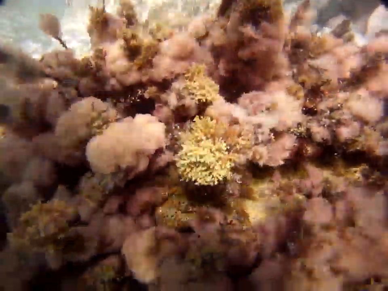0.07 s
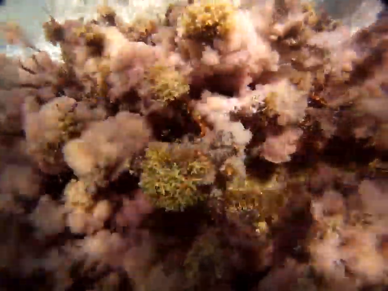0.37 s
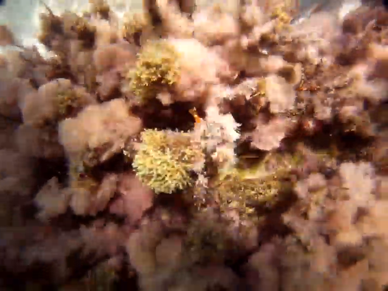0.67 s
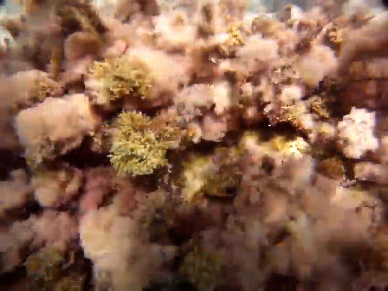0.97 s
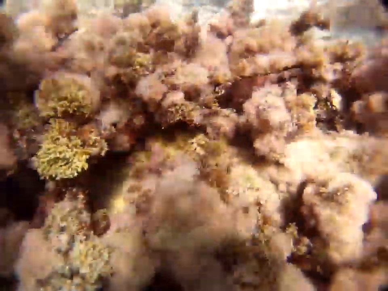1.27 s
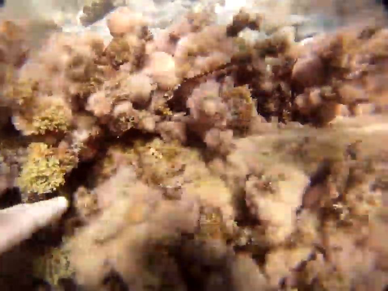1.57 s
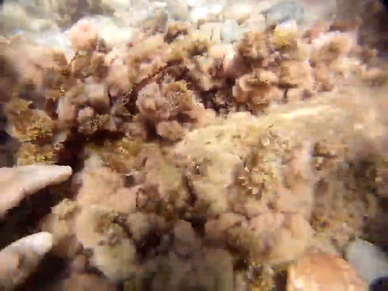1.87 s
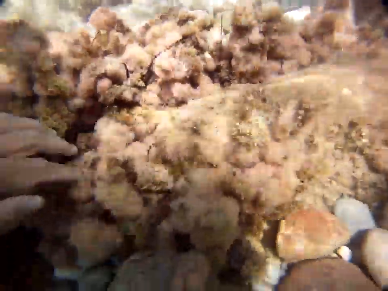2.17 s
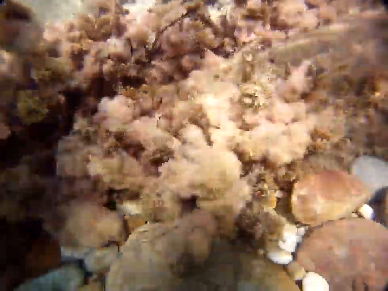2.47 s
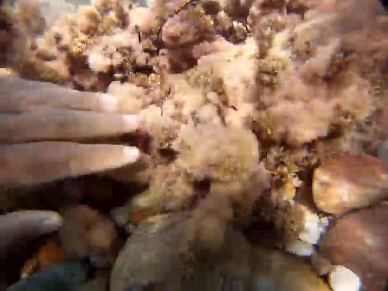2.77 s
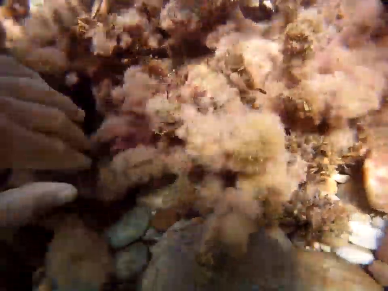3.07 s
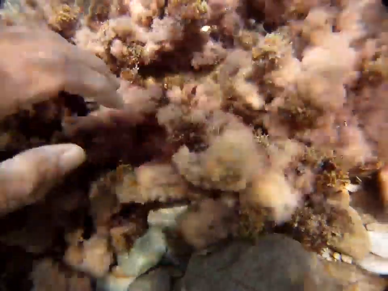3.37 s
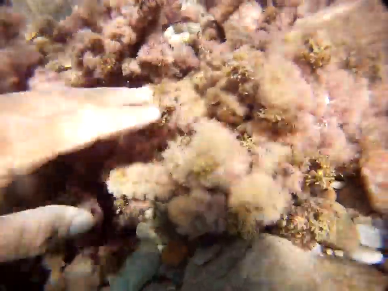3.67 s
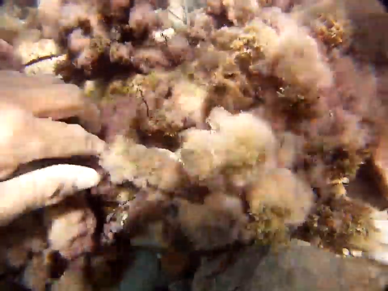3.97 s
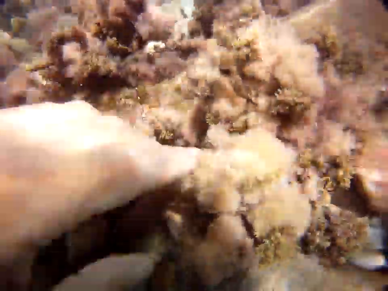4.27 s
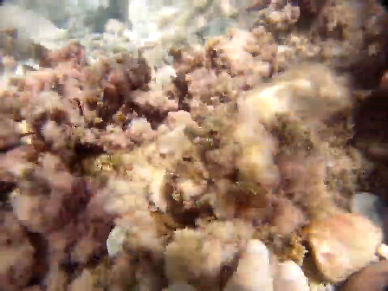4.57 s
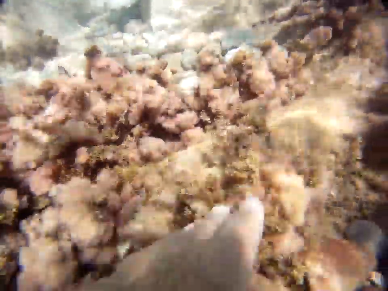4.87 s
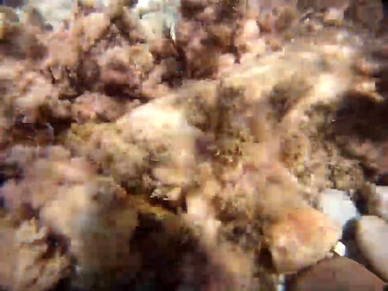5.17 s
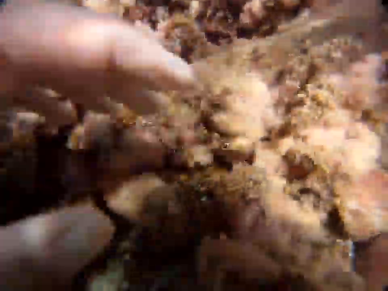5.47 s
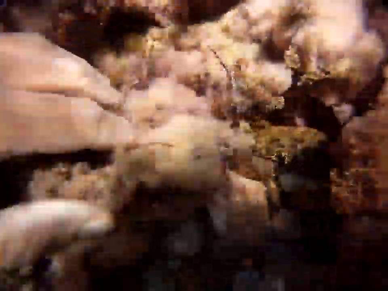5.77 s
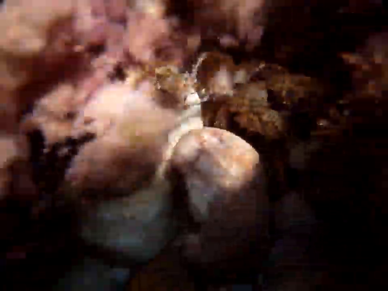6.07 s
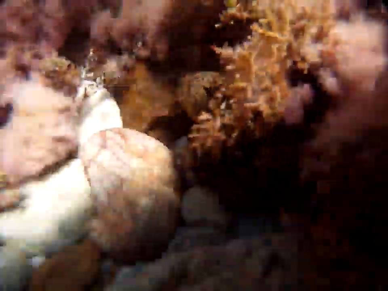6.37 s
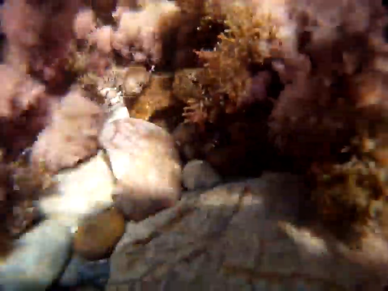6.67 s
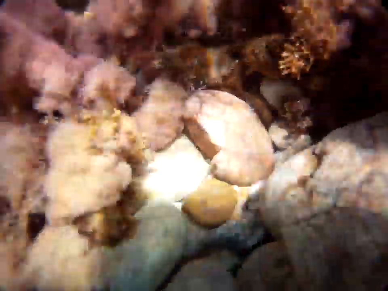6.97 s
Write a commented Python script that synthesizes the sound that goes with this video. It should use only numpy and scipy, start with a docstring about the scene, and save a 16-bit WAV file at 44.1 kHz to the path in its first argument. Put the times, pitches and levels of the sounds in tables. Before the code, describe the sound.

Heard underwater through a camera housing, air gulps and gurgles away while water sloshes, stones click and the housing takes hollow bumps.

```python
"""Under shallow surf, among weedy rocks, heard from inside a sealed camera housing.
Three times a pocket of air tears loose with a throbbing gulp and gurgles away as a cloud of bubbles.
Between them the water sloshes, rumbles and fizzes, single bubbles ping and pebbles click together.
Dull knocks ring the housing; near the end a surge drags gravel past and something scrapes by."""
import sys
import numpy as np
from scipy import signal
from scipy.fft import rfft, irfft
from scipy.io import wavfile
from scipy.ndimage import uniform_filter1d

SR = 44100
rng = np.random.default_rng(int(sys.argv[2]) if len(sys.argv) > 2 else 0)


def materialize(psi):
    """Save the field psi as 16-bit PCM at rate SR to the path in sys.argv[1].

    A 1-D psi becomes a single channel; in a 2-D psi each row is a channel.
    """
    bounded = np.clip(np.atleast_2d(psi).T, -1, 1)
    quanta = np.round(bounded * 32767).astype(np.int16)
    wavfile.write(sys.argv[1], SR, quanta)


N = 310023
TIME = np.arange(N) / SR

# Air pockets tearing loose. Each row: centre in seconds, level in dB, pocket pitch in Hz,
# length in seconds, housing ring in dB relative to the pocket.
AIR_POCKETS = [(0.373, -14, 191, 0.02, 2), (0.516, -28, 163, 0.01, -8), (0.546, -26, 160, 0.014, 4),
               (3.253, -22.5, 230, 0.012, 0.5), (3.283, -16.5, 280, 0.05, -5),
               (3.628, -20.5, 286, 0.0089, -15), (5.653, -12.5, 188, 0.0096, -9),
               (5.666, -10.5, 245, 0.019, 3), (5.975, -33.5, 235, 0.02, -10),
               (6.214, -31.5, 175, 0.013, -15)]
# Clouds of freed air. Each row: start in seconds, big-bubble level in dB, small-bubble level in dB,
# seconds before the cloud thins out.
AIR_CLOUDS = [(0.356, -28.5, -28, 0.21), (3.254, -32.5, -30, 0.23), (5.652, -34, -30, 0.25)]
# Knocks that ring the housing; those during the gurgles are part of their throbbing. Each row: start in
# seconds, peak in dB.
HOUSING_KNOCKS = [(0.46, -20.5), (0.536, -14.5), (4.482, -17), (4.558, -15), (4.607, -11), (4.71, -25.5),
                  (4.73, -12.5), (4.785, -18), (4.848, -18), (4.898, -19.5), (5.71, -17), (5.774, -22),
                  (5.825, -20), (5.891, -27), (6.21, -32)]
# Foreground bubbles. Each row: start in seconds, level in dB, pitch in Hz, seconds to fall 60 dB.
BUBBLE_PINGS = [(0.193, -38, 2080, 0.024), (0.239, -39.5, 3840, 0.05), (0.547, -24.5, 2066, .03),
                (0.6378, -31.5, 1380, 0.026), (0.816, -32, 2010, 0.006), (0.888, -33, 1333, 0.023),
                (0.97, -31.5, 686, 0.02), (1.097, -34, 495, 0.042), (1.372, -37.5, 643, 0.16),
                (2.201, -36, 1806, 0.045), (2.207, -31, 1290, 0.049), (2.409, -42, 1894, 0.093),
                (2.445, -32.5, 1800, 0.029), (2.45, -37.5, 2410, 0.063), (2.485, -29.5, 463, 0.16),
                (3.594, -38, 1570, 0.025), (3.897, -32, 498, 0.26), (3.99, -27, 511, 0.061),
                (4.044, -41, 1310, 0.044), (4.072, -34, 1240, .015), (4.171, -26.5, 450, 0.061),
                (5.021, -40, 1370, 0.049)]
# Foreground pebbles. Each row: start in seconds, peak in dB, treble boost or cut in dB.
PEBBLE_CLICKS = [(0.6368, -33.5, 14), (0.8355, -32.5, 9), (0.944, -32.5, -28), (1.159, -31, -22),
                 (1.3222, -33, -1), (1.6497, -34, 3), (1.6764, -14.5, 16.5), (1.88, -34, 3),
                 (2.2999, -35.5, -15), (2.4507, -33.5, 7), (2.665, -39, 16), (2.919, -40.5, -1),
                 (3.769, -47, 11), (3.9683, -39, 6), (4.2223, -33.5, 18), (6.1779, -28, -26),
                 (6.2982, -24.5, -9), (6.3272, -35, 23), (6.4045, -26.5, -19), (6.4823, -26.5, 21),
                 (6.4983, -24.5, 6), (6.538, -28.5, 1), (6.564, -26.5, 5), (6.9736, -31.5, -22)]
# Passing eddies. Each row: crest in seconds, slosh level in dB, bubble-shower level in dB.
WATER_EDDIES = [(0.07, -50.5, -58), (0.86, -50, -57.5), (1.598, -46.5, -57), (2.471, -38, -47.5),
                (4.0, -44, -55), (4.22, -38.5, -55), (4.52, -38, -66), (4.72, -40, -55.5)]
# Water shoving the housing. Each row: crest in seconds, rumble level in dB.
WATER_SHOVES = [(2.13, -56), (4.75, -40), (4.92, -47), (5.27, -49.5), (6.98, -41.5)]

# EQ curves that give each source its body. Each row: frequency in Hz, gain in dB.
BIG_AIR_EQ = [(20, -20.5), (45, -1.5), (75, -3.5), (110, 0), (135, -7), (175, -7), (250, 2), (310, 0),
              (380, -5), (700, -50.5)]  # deep burble of big bubbles
GURGLE_EQ = [(200, -39), (400, -11), (500, -3), (610, 3), (700, -10), (830, -16.5), (930, -28.5),
             (1130, -24.5), (1390, -24.5), (1850, -30), (2220, -24), (3300, -44.5), (5500, -85)]  # housing rattled by small bubbles
KNOCK_EQ = [(40, -28), (108, -14), (170, -15), (210, -26), (290, -3.5), (360, -21), (465, -3.5), (620, 7),
            (720, 1.5), (900, -32.5), (1060, -14), (1600, -32.5), (2250, -4), (3500, -34)]  # boxy ring of the bumped housing
CLICK_EQ = [(300, -34), (800, -6.5), (1400, 0), (1700, -5), (2100, 5), (2700, -11.5), (3700, -5.5),
            (4400, -15.5), (5500, -20)]  # hard tick of stone
GRAVEL_EQ = [(120, 2), (330, -5), (700, 4.5), (1200, -10), (1600, -8.5), (2050, -5.5), (2600, -10.5),
             (3600, -7.5), (4200, -21), (5000, -26), (5600, -14.5)]  # full-bodied tumble of stones
SCRAPE_EQ = [(500, -16), (1050, 4), (1400, -8), (1850, 3.5), (2400, -4), (2700, -10), (3200, -9), (3600, 3),
             (4100, -19), (4550, -19), (5000, -5), (5500, -13)]  # thin rasp on the housing
SLOSH_EQ = [(150, -23.5), (260, -19), (360, -17.5), (500, -4.5), (630, 1), (720, -5.5), (850, -17.5),
            (1100, -28.5), (2000, -32.5), (5000, -63)]  # hollow midrange of the water
CRACKLE_EQ = [(600, -9.5), (1000, -12), (1400, 5), (1700, -3.5), (2200, 5.5), (2900, -5), (3750, -7),
              (4400, -10), (5500, -9.5)]  # bright fizz of tiny bubbles and grit
RUMBLE_EQ = [(15, -16.5), (35, 3), (55, -6.5), (100, -5), (170, -13), (280, -13.5), (450, -21),
             (1000, -79.5)]  # low end of the moving water

LULL_S, LULL_WIDTH_S = 2.92, 0.35  # the water goes slack between two waves
SURGE_S, SURGE_RISE_S, SURGE_FALL_S = 6.45, 0.17, 0.097  # the surge builds, crests and lets go


def gulps(heave=0.3, churn_db=-10, housing_hz=612):
    """A pocket of air throbs for a few cycles as it tears off, and shakes the housing with it."""
    out = np.zeros(N)
    churn = coloured(rng.standard_normal(N), GURGLE_EQ)
    burble = coloured(rng.standard_normal(N), BIG_AIR_EQ)
    for s, db, pocket_hz, length, ring_db in AIR_POCKETS:
        t = np.arange(-length, length, 1 / SR)
        envelope = np.exp(-np.pi * (2 * t / length) ** 2)
        pocket = np.cos(2 * np.pi * pocket_hz * t) + heave * np.interp(s + t, TIME, burble)
        housing = np.cos(2 * np.pi * housing_hz * t) + from_db(churn_db) * np.interp(s + t, TIME, churn)
        add(out, s - length, from_db(db) * envelope * (pocket + from_db(ring_db) * housing))
    return out


def gurgles(attack_s=0.0097, rush_db=10, rush_s=0.049, sag_db_per_s=20,
            big_fade_db_per_s=107, small_fade_db_per_s=114):
    """Freed air breaks up: big bubbles burble, small ones rattle the housing; both thin as they rise."""
    big, small = 0, 0
    for s, big_db, small_db, hold_s in AIR_CLOUDS:
        age = np.maximum(TIME - s, 0)
        thinning_s = np.maximum(age - hold_s, 0)
        flow = np.minimum(age / attack_s, 1) * from_db(-sag_db_per_s * age)
        accent_db = rush_db * np.exp(-age / rush_s)
        big += flow * from_db(big_db + accent_db - big_fade_db_per_s * thinning_s)
        small += flow * from_db(small_db - small_fade_db_per_s * thinning_s)
    throb = from_db(1.9 * drift(rate=11.5))
    return throb * (big * cloud(BIG_AIR_EQ, per_s=1200) + small * cloud(GURGLE_EQ, per_s=2500))


def cloud(eq, per_s):
    """Bubbles so many that their sum stays fairly even from moment to moment."""
    sound = coloured(grains(per_s, spread_db=3.5), eq)
    local_power = uniform_filter1d(sound ** 2, size=1300)
    return sound / np.sqrt(local_power + 1e-6)


def knocks(contact_s=0.0013, judder=0.038, judder_s=0.0097):
    """Soft bumps ring the housing for a few cycles; each ends in a short judder of its own."""
    out, t = np.zeros(N), TIME[:SR // 30]
    housing = impulse_response(KNOCK_EQ)
    push = t * np.exp(-2 * t / contact_s)
    for s, db in HOUSING_KNOCKS:
        bump = (t == 0) + judder * rng.standard_normal(len(t)) * np.exp(-t / judder_s)
        force = signal.fftconvolve(bump, push)
        thud = signal.fftconvolve(force, housing)
        add(out, s, from_db(db) * thud / np.abs(thud).max())
    return out


def bubbles(onset_cycles=0.75, partner_db=-11, partner_ratio=1.12):
    """Each bubble pings as a dying sine, beating against a smaller one that splits off with it."""
    out, t = np.zeros(N), TIME[:SR // 8]
    wobble = from_db(2 * drift(rate=150))  # the level wavers with the bubble's shape
    for s, db, hz, t60 in BUBBLE_PINGS:
        envelope = from_db(-60 * t / t60) * (1 - np.exp(-t * hz / onset_cycles))
        partner = np.sin(2 * np.pi * (partner_ratio * hz * t + rng.random()))
        pair = np.sin(2 * np.pi * hz * t) + from_db(partner_db) * partner
        ping = envelope / envelope.max() * pair
        add(out, s, from_db(db) * ping * np.interp(s + t, TIME, wobble))
    return out


def pebbles(scatter_s=0.0033, treble_hz=2800):
    """Stone meets stone: a sharp tick and a few milliseconds of scatter from the rocks around."""
    out, t = np.zeros(N), TIME[:SR // 30]
    stone = impulse_response(CLICK_EQ)
    lowpass = signal.butter(3, treble_hz, "low", fs=SR, output="sos")
    highpass = signal.butter(3, treble_hz, "high", fs=SR, output="sos")
    for s, db, treble_db in PEBBLE_CLICKS:
        contact = (t == 0) + rng.standard_normal(len(t)) * np.exp(-t / scatter_s)
        tick = signal.fftconvolve(contact, stone)
        click = signal.sosfilt(lowpass, tick) + from_db(treble_db) * signal.sosfilt(highpass, tick)
        add(out, s, from_db(db) * click / np.abs(click).max())
    return out


def gravel(level_db=-37):
    """Small stones tumble and clack as the surge pulls at them."""
    clacks = pips(per_s=400, spread_db=3, cycles=43, low_hz=1080, high_hz=5200)
    contacts = grains(per_s=650, spread_db=3.6) + 0.5 * clacks + 0.2 * rng.standard_normal(N)
    surge = swell(SURGE_S, SURGE_RISE_S, SURGE_FALL_S)
    return from_db(level_db) * surge * coloured(contacts, GRAVEL_EQ)


def scrape(level_db=-40.5):
    """Something rubs briefly along the housing in a dense rasp of tiny contacts."""
    rasp = coloured(grains(per_s=6000, spread_db=3.5), SCRAPE_EQ)
    return from_db(level_db) * hump(crest_s=6.872, width_s=0.018) * rasp


def sloshing(bed_db=-49.5, lull_db=-6, plop_db=-9):
    """Water sloshes and plops round the housing, louder in each eddy."""
    splashes = grains(per_s=900, spread_db=2) * from_db(2.67 * drift(rate=29))
    slosh = coloured(splashes, SLOSH_EQ)
    plops = pips(per_s=45, spread_db=2.5, cycles=87, low_hz=450, high_hz=704, count=8)
    eddies = [from_db(db) * swell(s, rise_s=0.031, fall_s=0.18) for s, db, _ in WATER_EDDIES]
    return (slosh + from_db(plop_db) * plops) * together(bed_gain(bed_db, lull_db), *eddies)


def showers():
    """Each eddy tears off a quick run of tiny bubbles that pip at pitches of their own."""
    tiny_bubbles = pips(per_s=450, spread_db=4, cycles=40, low_hz=802, high_hz=4100)
    eddies = [from_db(db) * swell(s, rise_s=0.083, fall_s=0.07) for s, _, db in WATER_EDDIES]
    return coloured(tiny_bubbles, CRACKLE_EQ) * together(*eddies)


def rumbling(bed_db=-54, lull_db=-2.5, surge_db=-43):
    """The moving water rumbles, more so when it shoves the housing and during the surge."""
    churn = rng.standard_normal(N) * from_db(1.8 * drift(rate=28))
    shoves = [from_db(db) * hump(s, width_s=0.1) for s, db in WATER_SHOVES]
    surge = from_db(surge_db) * hump(SURGE_S, width_s=0.36)
    return coloured(churn, RUMBLE_EQ) * together(bed_gain(bed_db, lull_db), surge, *shoves)


def crackling(bed_db=-57.5, lull_db=-3.5, surge_db=-49, grit_db=-9, pip_db=-6):
    """Tiny bubbles pip and grit ticks in the fizz of far surf, in flurries as the bed is stirred."""
    flurry = from_db(3.1 * drift(rate=7))
    tiny_bubbles = pips(per_s=150 * flurry, spread_db=4, cycles=65, low_hz=973, high_hz=4860)
    grit = grains(per_s=80 * flurry, spread_db=8.5)
    fizz = rng.standard_normal(N) + from_db(grit_db) * grit + from_db(pip_db) * tiny_bubbles
    surge = from_db(surge_db) * swell(SURGE_S, SURGE_RISE_S, SURGE_FALL_S)
    return coloured(fizz, CRACKLE_EQ) * together(bed_gain(bed_db, lull_db), surge)


def bed_gain(bed_db, lull_db):
    """A background layer's steady gain, dipping once as the water goes slack."""
    return from_db(bed_db + lull_db * hump(LULL_S, LULL_WIDTH_S))


def grains(per_s, spread_db):
    """Random tiny impacts, mostly weak and now and then strong; rms 1."""
    hits = rng.random(N) < per_s / SR
    sizes = from_db(spread_db * np.minimum(rng.exponential(1, N), 4))
    return rms_one(hits * sizes * rng.choice([-1, 1], N))


def pips(per_s, spread_db, cycles, low_hz, high_hz, count=18):
    """Grains that each ring at one of `count` pitches, falling 60 dB over `cycles` cycles; rms 1."""
    taps = grains(per_s, spread_db)
    pitch_index = rng.integers(0, count, N)
    out = np.zeros(N)
    for k, hz in enumerate(np.geomspace(low_hz, high_hz, count)):
        decay = from_db(-60 * hz / (cycles * SR))
        angle = 2 * np.pi * hz / SR
        resonator = [0, np.sin(angle) * np.sqrt(hz)], [1, -2 * decay * np.cos(angle), decay ** 2]
        out += signal.lfilter(*resonator, taps * (pitch_index == k) + 1e-18)
    return rms_one(out)


def impulse_response(eq, size=4096):
    """The minimum-phase ring of one tap on a body with this EQ curve; peak 1."""
    hz, db = np.transpose(eq)
    grid_hz = np.maximum(np.arange(size // 2 + 1) * SR / size, 1)
    gain = from_db(np.interp(np.log(grid_hz), np.log(hz), db))
    cepstrum = irfft(np.log(gain))
    cepstrum[1:size // 2] *= 2  # folding puts all the ring after the tap
    cepstrum[size // 2 + 1:] = 0
    ring = irfft(np.exp(rfft(cepstrum)))
    return ring / np.abs(ring).max()


def coloured(x, eq):
    """Play x through a body with this EQ curve; rms 1."""
    return rms_one(signal.fftconvolve(x, impulse_response(eq))[:N])


def drift(rate, step=40):
    """Smooth random modulation with spread 1, changing about `rate` times a second."""
    pole = np.exp(-2 * np.pi * step * rate / SR)
    noise = rng.standard_normal(N // step + 2002)
    slow = signal.lfilter([1], [1, -2 * pole, pole ** 2], noise)[2000:]  # once the filter has settled
    return np.interp(np.arange(N) / step, np.arange(len(slow)), rms_one(slow))


def hump(crest_s, width_s):
    """A bell-shaped fade up to 1 and back."""
    return np.exp(-np.minimum(((TIME - crest_s) / width_s) ** 2, 100))


def swell(crest_s, rise_s, fall_s):
    """An exponential build to 1 and an exponential tail."""
    return np.exp(-np.maximum((crest_s - TIME) / rise_s, (TIME - crest_s) / fall_s))


def together(*gains):
    """Gain of unrelated sounds heard at once: their powers sum."""
    return np.sqrt(sum(gain ** 2 for gain in gains))


def from_db(db):
    """Decibels to gain."""
    return 10 ** (np.asarray(db) / 20)


def rms_one(x):
    """Scale to rms 1."""
    return x / np.sqrt(np.mean(x ** 2) + 1e-20)


def add(out, s, sound):
    """Mix a short sound in at s seconds."""
    start = max(round(s * SR), 0)
    out[start:start + len(sound)] += sound[:max(N - start, 0)]


def scene():
    """Foreground events over the wash; the housing passes the same sound to both channels."""
    wash = sloshing() + rumbling() + crackling() + showers()
    water = wash + gulps() + gurgles() + knocks() + bubbles() + pebbles() + gravel() + scrape()
    return np.array([water, water])


def record(dry, band_hz=5450, converter_hz=12000, hiss_db=-77, cutoff_hz=15700):
    """Lo-fi finish: a slow converter's held samples add faint mirror images; light hiss; a top cut."""
    narrow = signal.sosfilt(signal.cheby1(8, 0.5, band_hz, fs=SR, output="sos"), dry)
    samples = signal.resample_poly(narrow, converter_hz, SR, axis=1)
    held = np.repeat(samples, 4, axis=1)
    mirrored = signal.resample_poly(held, SR, 4 * converter_hz, axis=1)[:, :N]
    hiss = from_db(hiss_db) * rng.standard_normal((2, N))
    top_cut = signal.ellip(10, 0.3, 80, cutoff_hz, fs=SR, output="sos")
    return signal.sosfilt(top_cut, mirrored + hiss)


dry = scene()
out = record(dry)
materialize(out)
```